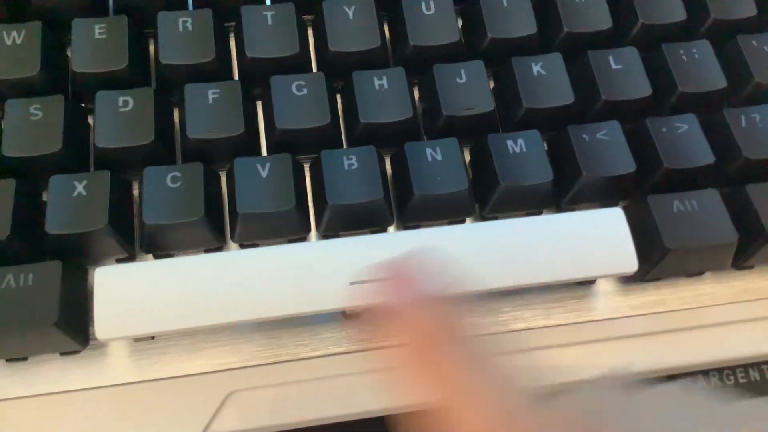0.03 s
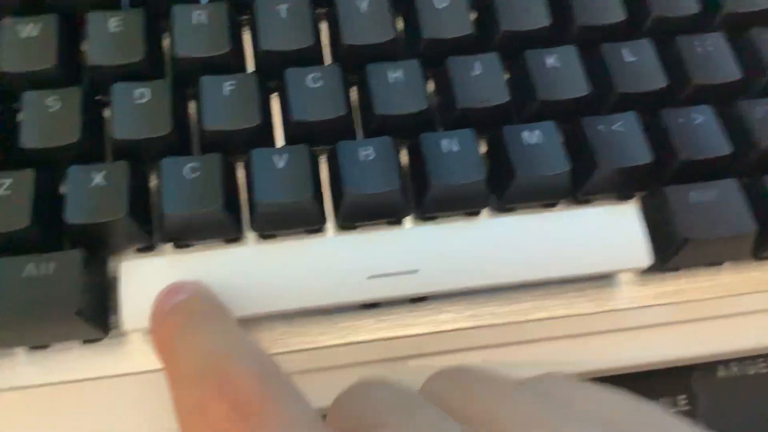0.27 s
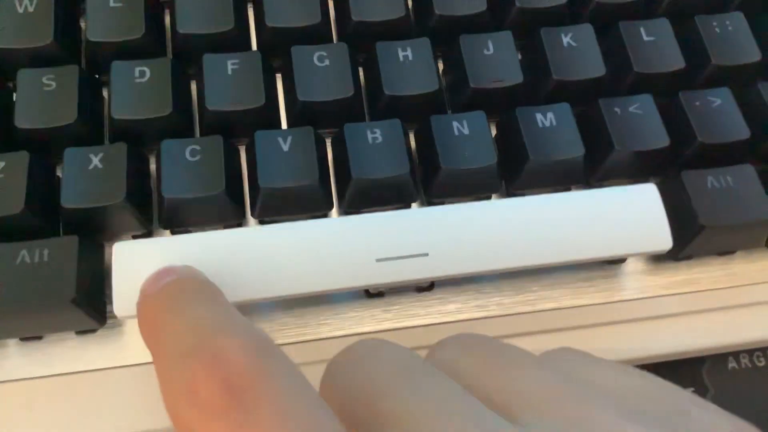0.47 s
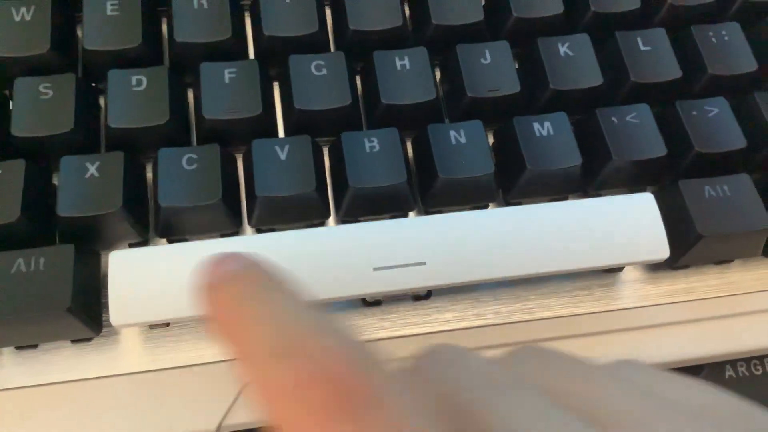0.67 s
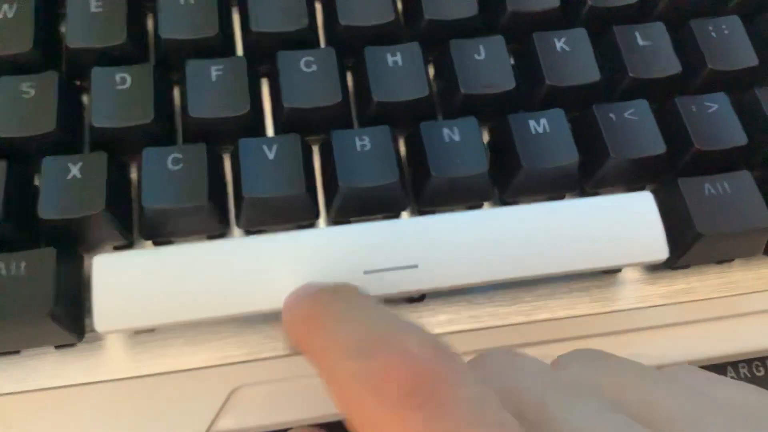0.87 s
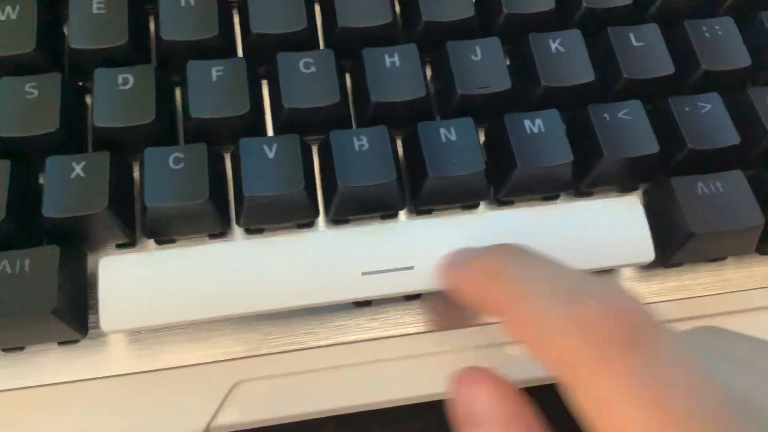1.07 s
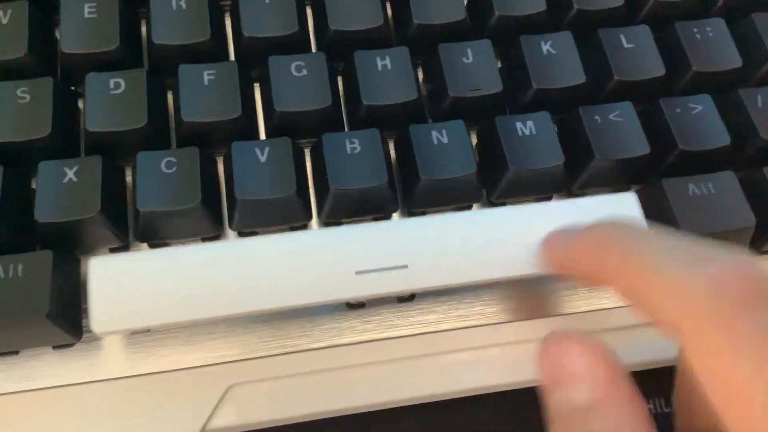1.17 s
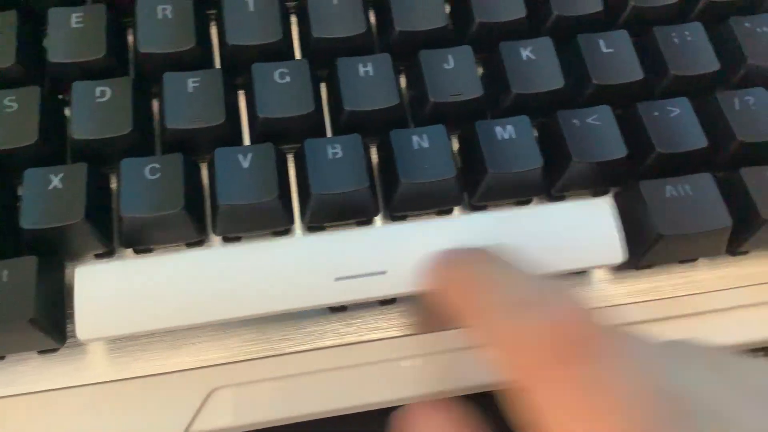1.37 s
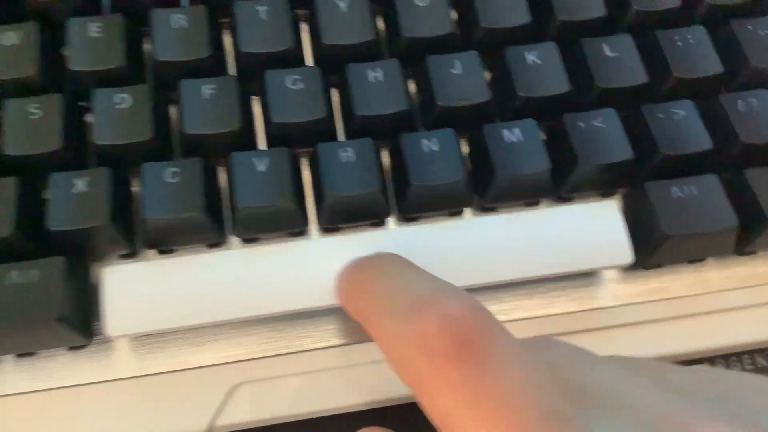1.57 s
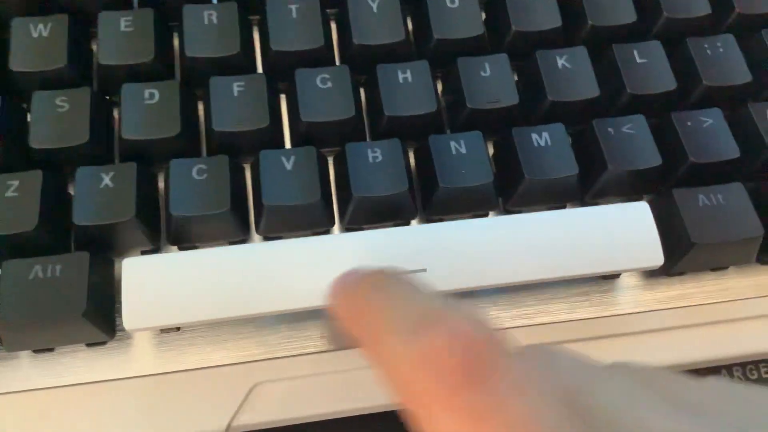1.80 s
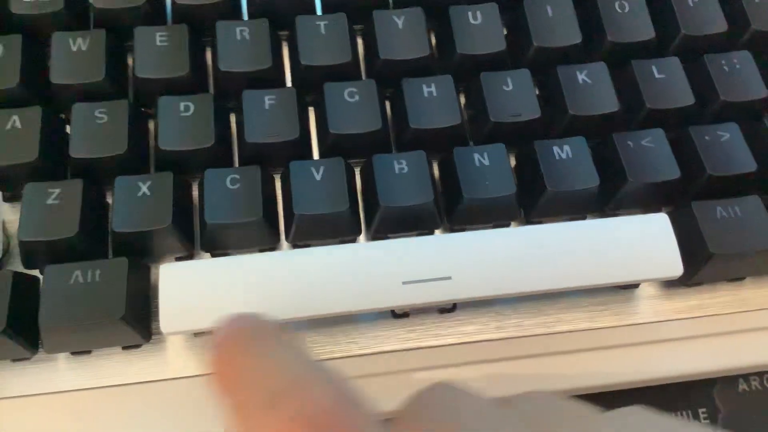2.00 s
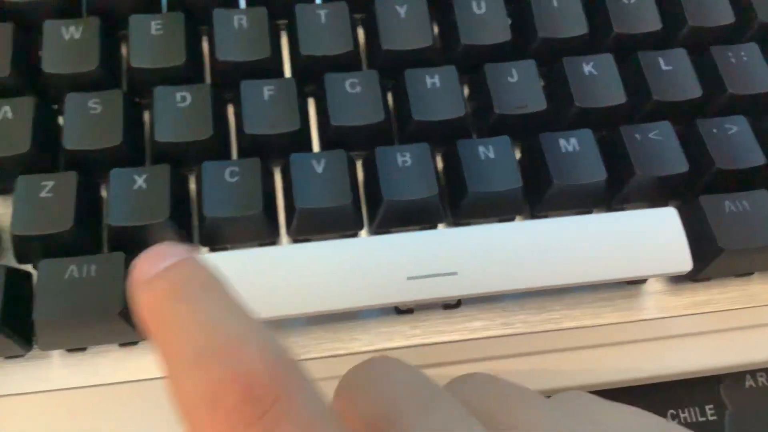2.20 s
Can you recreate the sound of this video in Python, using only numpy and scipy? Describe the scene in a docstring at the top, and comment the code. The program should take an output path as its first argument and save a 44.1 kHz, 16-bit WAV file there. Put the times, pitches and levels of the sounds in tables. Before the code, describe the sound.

A loose keyboard spacebar clacks sharply as a finger taps it quickly and repeatedly.

```python
"""In a small room, close by, a finger taps a loose plastic spacebar eleven times.
The fingertip slaps the bar, or slack parts tick. The bar then clacks at the bottom, thumping the desk,
and springs back with a second, usually louder clack. It rocks, so its two ends land a moment apart;
they chatter and make the bar and keyboard case ring. Faint rubbing runs between the taps, and the room
adds a short echo, a low rumble, hiss and a thin steady tone."""
import sys
import numpy as np
from scipy import signal
from scipy.fft import rfft, irfft
from scipy.io import wavfile
from scipy.ndimage import uniform_filter1d

SR = 44100
rng = np.random.default_rng(int(sys.argv[2]) if len(sys.argv) > 2 else 0)


def pcm_store(signal):
    """Save signal as 16-bit PCM."""
    levels = np.round(np.clip(np.atleast_2d(signal), -1, 1) * 32767)
    wavfile.write(sys.argv[1], SR, levels.astype(np.int16).T)


N = 99225

# The bar hits bottom. bright_db sets the high treble against the low treble; shell_db (hollow bar) and
# case_db (case knock) count from level_db; second_db sets the later end of the bar against the first.
# start_s, level_db, bright_db, shell_db, case_db, second_lag_s, second_db, desk_knock_db, desk_boom_db,
# hollow_hz, hollow_boost_db, crack_hz
BAR_PRESSES = [(0.25, -19.5, 6, -24.5, -25, 0.0011, -8.5, -40.5, -36, 1980, 15, 11900),
               (0.3962, -28.5, 7.5, -16, -20, 0.0014, -21, -49.5, -43.5, 1440, 7, 12400),
               (0.5292, -25, 5, -17, -18, 0.00081, 21, -44.5, -44, 1370, 6, 10700),
               (0.7659, -20, 15, -22, -25.5, 0.00054, 12, -44.5, -37, 1900, 6, 11700),
               (0.9185, -26.5, 4, -15.5, -26.5, 0.0028, 5, -49.5, -40, 1900, 5, 5650),
               (1.072, -26.5, 7, -18, -25.5, 0.00092, -1.5, -45.5, -39.5, 2150, -0.5, 13600),
               (1.2156, -21, 7, -18, -27.5, 0.00077, 15, -46, -43.5, 2120, -0.5, 13500),
               (1.4037, -34, 6, -13.5, -18.5, 0.0012, -21, -52, -43, 1320, 11.5, 13300),
               (1.571, -21, 0, -20.5, -22.5, 0.0019, 1.5, -41.5, -37, 2080, 8, 12000),
               (1.7204, -23.5, 4, -18, -30, 0.0046, -2, -43.5, -40.5, 2290, 7, 5500),
               (1.889, -31.5, 9, -17.5, -24, 0.0031, -3, -46.5, -43, 2780, 6.5, 12100)]
# The bar springs back to its stop: start_s, level_db, bright_db, shell_db, case_db, second_lag_s,
# second_db, build_s, hollow_hz, hollow_boost_db, crack_hz
BAR_RELEASES = [(0.3371, -21.5, 6.5, -11.5, -21.5, 0.0009, -18, 0.00058, 2330, 7.5, 8950),
                (0.472, -14, 7, -22.5, -35.5, 0.0056, -19, 0.0004, 2340, 3, 9400),
                (0.6233, -17, 1, -21, -30, 0.0019, -0.5, 0.00055, 2050, 6, 9120),
                (0.8564, -24, 2.5, -16.5, -31, 0.0039, 1, 0.0007, 1600, 1, 7400),
                (0.9891, -19.5, 4.5, -18.5, -28, 0.0022, -5, 0.00063, 2760, 1, 10400),
                (1.151, -18, 4.5, -22.5, -40.5, 0.0037, -4.5, 0.00079, 3050, 5.5, 10470),
                (1.3214, -21, 4, -21, -41, 0.006, -6.5, 0.00038, 2780, -0.5, 9550),
                (1.4832, -16.5, 2, -19, -25.5, 0.0022, 11, 0.0004, 1700, 7, 10500),
                (1.6655, -20.5, 6, -21, -41.5, 0.0025, -0.5, 0.0005, 1590, 1.5, 10350),
                (1.7856, -12, 2.5, -23, -29.5, 0.0025, -0.5, 0.00077, 1400, 6, 7860),
                (1.9543, -15.9, 3, -19.5, -28, 0.0039, -1, 0.0014, 1206, 6, 7230)]
# The fingertip hits the raised bar:
# start_s, level_db, bright_db, shell_db, build_s, hollow_hz, hollow_boost_db, crack_hz
FINGER_SLAPS = [(0.2436, -16.5, 4.5, -21.5, 0.0014, 2040, 13.5, 10200),
                (0.7561, -20, -1, -21.5, 0.0011, 2100, 12, 9400),
                (1.0446, -24.5, 2.5, -23.5, 0.001, 2520, 8, 6760),
                (1.5598, -23.5, -3, -26, 0.00054, 2314, 5, 9250)]
# Ticks of the switch and the slack support wire: start_s, level_db, bright_db, build_s, crack_hz
SLACK_TICKS = [(0.073, -63.5, 6, 0.0002, 8000), (0.176, -65.5, 0, 0.0002, 8000),
               (0.288, -43, 15, 0.0002, 13000), (0.377, -31, -3, 0.0023, 6050),
               (0.381, -39, -2, 0.0003, 6200), (0.479, -28.5, 0, 0.00046, 9100),
               (0.513, -33.5, 0, 0.0013, 5900), (0.517, -32, 0, 0.0003, 6600),
               (0.616, -35, -2, 0.0002, 7000), (0.6315, -31, 8, 0.00033, 6200),
               (0.8936, -39.5, -9, 0.0002, 5800), (0.8994, -38, -1, 0.0007, 5800),
               (0.9801, -37, -2, 0.0002, 7500), (1.1935, -33.5, 1, 0.0023, 8600),
               (1.2134, -31.5, 1, 0.00043, 8650), (1.352, -38.5, 1.5, 0.002, 8900),
               (1.4475, -44, 5, 0.0012, 10400), (1.506, -38.5, 5, 0.0004, 8900),
               (1.658, -37, 9, 0.0003, 10300), (1.6957, -38, 0, 0.0014, 6250),
               (1.7028, -37.5, 0.5, 0.00035, 7020), (1.808, -37, 11, 0.00047, 10300),
               (1.8634, -28, 0, 0.00063, 6150), (1.8656, -29, -3, 0.00035, 8900),
               (2.075, -59.5, 4, 0.00024, 10100), (2.176, -66, 1.5, 0.00017, 8000)]
# Pitches at which the bar and case ring: pitch_hz, width_hz, gain_db
BAR_RINGS = [(660, 66, -4), (767, 160, -5), (1248, 133, -1.5), (1594, 184, 6), (2044, 216, 4),
             (2323, 130, 4), (2802, 257, 5.5), (3764, 660, -1), (6533, 69, 3.5), (6720, 200, -1),
             (7830, 160, 1.5), (8300, 200, -9), (9810, 520, 5.5), (12600, 310, -18)]
# Tone of the dry crack of plastic on plastic: pitch_hz, gain_db
CRACK_TONE = [(450, -11.5), (700, -6), (1000, -21), (1500, -14), (3200, -5), (5000, -7), (6500, 0),
              (8000, 2), (10400, 0), (11500, -4), (13500, -4), (15800, -24.5)]
# Ranges of a clack (case knock, hollow shell, snap, low treble, high treble): low_hz, high_hz
CLACK_BANDS = [(600, 950), (1080, 2950), (3300, 5200), (5200, 9200), (9200, 17000)]
# The desk's short knock: pitch_hz, gain_db, delay_s, rise_s, decay_s
KNOCK_RINGS = [(298, 2.5, .005, 0.0055, 0.016), (234.5, 2, 0.002, 0.017, 0.023),
               (201.3, 0, 0.0019, 0.0095, 0.034), (381.6, -0.5, 0.0024, 0.00093, 0.0066)]
# The desk's deeper boom: pitch_hz, gain_db, delay_s, rise_s, decay_s
BOOM_RINGS = [(121.7, 0, 0.0094, 0.034, 0.0085), (141.5, -11.5, .008, 0.026, 0.068),
              (94.7, -13.5, .018, 0.016, 0.052)]
# The room's echo tail, which takes fade_s to drop by 60 dB: pitch_hz, gain_db, fade_s
ROOM_TAIL = [(120.3, -9, 0.38), (302, -4, 0.51), (626, -11, 0.33), (910, -12, 0.23), (1090, -3, 0.37),
             (1440, -9.5, 0.29), (2280, -12.5, 0.2), (4030, -12, 0.24), (7940, -17, 0.22),
             (13400, -20, 0.2)]
# Tone of the still room's rumble and the microphone's hiss: pitch_hz, gain_db
BACKGROUND_TONE = [(25, -40.5), (38, -38), (55, -4.5), (108, 7), (170, -6), (230, -4), (380, -20.5),
                   (620, -11), (740, -16), (820, -10), (950, -23.5), (2500, -29.5), (6000, -30.5),
                   (8500, -26.5), (9800, -17.5), (10800, -23.5), (12000, -20.5), (16000, -43.5)]

CLACK_SAMPLES, LEAD_S = 4096, .012  # the lead leaves space for the build-up before a landing
CHATTER_DECAY_S, CRACK_DECAY_S, BUZZ_DECAY_S = .00141, .0027, .0073
PRESS_BUILD_S, SECOND_BUILD_S, BUZZ_BUILD_S = .00034, .0006, .0012
GRAIN_DB, DETUNE_HZ = 4, 35  # unevenness of the tiny contacts; how far the finger shifts the ringing
CRACK_DB, BUZZ_DB, SNAP_DB = 3, -22, -21  # compared with the ringing, first landing and clack level
LIGHT_CASE_DB, LIGHT_LAG_S, LIGHT_SECOND_DB = -33.5, .0012, -24  # shared by ticks and slaps


def gain(db):
    """Turn decibels into a multiplier."""
    return 10 ** (np.asarray(db) / 20)


def at_level(x, db, burst_s=.01):
    """Give a sound the energy of a short burst at this level."""
    return x * gain(db) * np.sqrt(burst_s * SR / np.sum(x ** 2))


def tone_db(table, hz):
    """Read gains between a table's rows, on a musical pitch scale."""
    pitches, gains_db = np.array(table).T
    return np.interp(np.log(hz + 1), np.log(pitches), gains_db)


def hump_db(hz, centre_hz, db, width):
    """A rounded boost around one pitch; width is a share of that pitch."""
    return db * np.exp(-(np.log((hz + 1) / centre_hz) / width) ** 2)


def tone_filter(db):
    """A filter with these gains that rings only after a hit, never before it."""
    cepstrum = irfft(np.log(gain(db)))
    half = len(cepstrum) // 2
    cepstrum[1:half] *= 2
    cepstrum[half + 1:] = 0
    return np.exp(rfft(cepstrum))


def add(out, x, start_s):
    """Mix a sound in at a given time."""
    i = max(int(round(start_s * SR)), 0)
    out[i:i + len(x)] += x[:max(len(out) - i, 0)]


def background(noise_db=-62, whine_hz=834, whine_db=-79.5):
    """Low room rumble, faint hiss and a thin steady tone."""
    hz = np.arange(N // 2 + 1) * SR / N
    noise = irfft(rfft(rng.standard_normal(N)) * gain(tone_db(BACKGROUND_TONE, hz)), N)
    whine = np.sqrt(2) * np.sin(2 * np.pi * whine_hz * np.arange(N) / SR)
    return gain(noise_db) * noise / np.std(noise) + gain(whine_db) * whine


def landing(t, build_s, decay_s):
    """Strength of one landing: chatter builds up as the parts meet, then dies away."""
    return np.exp(np.minimum(t, 0) / build_s - np.maximum(t, 0) / decay_s)


def clack(level_db, bright_db, shell_db, case_db, second_lag_s, second_db, build_s,
          hollow_hz, hollow_boost_db, crack_hz):
    """Both ends of the bar land and chatter; the tiny contacts crack and ring the bar and case."""
    n = CLACK_SAMPLES
    t = np.arange(n) / SR - LEAD_S
    hz = np.arange(n // 2 + 1) * SR / n
    grains = rng.choice([-1, 1], n) * gain(GRAIN_DB * np.clip(rng.standard_normal(n), -2, 2))
    ring = 0
    for pitch_hz, width_hz, db in BAR_RINGS:
        pitch_hz *= 1 + min(DETUNE_HZ / pitch_hz, .04) * rng.standard_normal()
        damping = 1j * hz * width_hz
        ring = ring + gain(db) * damping / (pitch_hz ** 2 - hz ** 2 + damping)
    crack = gain(CRACK_DB) * tone_filter(tone_db(CRACK_TONE, hz))
    # The spot where the blow lands favours one hollow pitch and one crack pitch.
    spot = tone_filter(hump_db(hz, hollow_hz, hollow_boost_db, width=.14)
                       + hump_db(hz, crack_hz, db=6, width=.078))
    buzz = gain(BUZZ_DB) * landing(t, BUZZ_BUILD_S, BUZZ_DECAY_S)  # the loose bar buzzes on

    def force(delay_s, decay_s):
        """Spectrum of the grainy push from both ends and the buzz."""
        first = landing(t - delay_s, build_s, decay_s)
        second = gain(second_db) * landing(t - delay_s - second_lag_s, SECOND_BUILD_S, decay_s)
        return rfft(grains * np.sqrt(first ** 2 + buzz ** 2 + second ** 2))

    def band(edges_hz, db, delay_s=0, decay_s=None):
        """One pitch range of the clack; decay_s, if given, is shared by chatter and crack."""
        ringing = ring * force(delay_s, decay_s or CHATTER_DECAY_S)
        cracking = crack * force(delay_s, decay_s or CRACK_DECAY_S)
        band_pass = signal.butter(4, edges_hz, "band", fs=SR, output="sos")
        return at_level(signal.sosfilt(band_pass, irfft(spot * (ringing + cracking))), db)

    case_hz, shell_hz, snap_hz, low_treble_hz, high_treble_hz = CLACK_BANDS
    treble = at_level(band(low_treble_hz, 0) + band(high_treble_hz, bright_db), level_db)
    shell = band(shell_hz, level_db + shell_db, delay_s=.00012, decay_s=.005)
    snap = band(snap_hz, level_db + SNAP_DB, decay_s=.006)
    knock = band(case_hz, level_db + case_db, delay_s=.0017, decay_s=.0034)
    return treble + shell + snap + knock


def ticks():
    """The switch and the slack wire tick, like tiny clacks."""
    out = np.zeros(N)
    for start_s, level_db, bright_db, build_s, crack_hz in SLACK_TICKS:
        tick = clack(level_db, bright_db, shell_db=-18, case_db=LIGHT_CASE_DB,
                     second_lag_s=LIGHT_LAG_S, second_db=LIGHT_SECOND_DB, build_s=build_s,
                     hollow_hz=2800, hollow_boost_db=3, crack_hz=crack_hz)
        add(out, tick, start_s - LEAD_S)
    return out


def echo_tail(rise_s=.004):
    """Many small echoes blur into a short tail that lasts longest in the bass."""
    n = 4 * CLACK_SAMPLES
    t = np.arange(n) / SR
    hz = np.arange(n // 2 + 1) * SR / n
    noise = rfft(rng.standard_normal(n))
    log_pitches = np.log([row[0] for row in ROOM_TAIL])
    tail = 0
    for this_row, (_, db, fade_s) in zip(np.eye(len(ROOM_TAIL)), ROOM_TAIL):
        band = irfft(noise * np.interp(np.log(hz + 1), log_pitches, this_row))
        fade = np.minimum(t / rise_s, 1) * np.exp(-np.log(1000) * t / fade_s)
        tail = tail + gain(db) * band * fade / np.sqrt(np.sum(fade ** 2))
    return tail


def room(x, tails=5, hand_move_s=.1103, wall_s=.018, wall_db=-24.5):
    """Add a near wall's echo and a tail that shifts as the moving hand changes the sound's paths."""
    out = x.copy()
    hand_place = np.arange(N) / SR / hand_move_s
    for k in range(tails):
        share = np.clip(1 - np.abs((hand_place - k) % tails - 1), 0, 1)  # the tails take turns
        out += signal.fftconvolve(x * np.sin(np.pi / 2 * share), echo_tail())[:N]
    add(out, gain(wall_db) * x, wall_s)
    return out


def rubbing(level_db=-56, uneven_db=6, grain_samples=128):
    """The finger and the slack wire rub faintly while the hand is at work."""
    hz = np.arange(N // 2 + 1) * SR / N
    grains = gain(uneven_db * np.minimum(rng.exponential(size=N // grain_samples + 1), 3))
    roughness = uniform_filter1d(np.repeat(grains, grain_samples), grain_samples)[:N]
    rub = irfft(rfft(roughness * rng.standard_normal(N)) * gain(tone_db(CRACK_TONE, hz)), N)
    at_work = np.interp(np.arange(N) / SR, [.24, .3, 1.9, 1.96], [0, 1, 1, 0])
    return rub / np.std(rub) * gain(level_db) * at_work


def slaps():
    """The fingertip strikes the raised bar and slams out its slack."""
    out = np.zeros(N)
    for start_s, level_db, bright_db, shell_db, build_s, *tone in FINGER_SLAPS:
        slap = clack(level_db, bright_db, shell_db, LIGHT_CASE_DB, LIGHT_LAG_S, LIGHT_SECOND_DB,
                     build_s, *tone)
        add(out, slap, start_s - LEAD_S)
    return out


def presses():
    """The bar clacks at the bottom and thumps the desk."""
    out = np.zeros(N)
    for start_s, *blow, knock_db, boom_db, hollow_hz, hollow_boost_db, crack_hz in BAR_PRESSES:
        add(out, clack(*blow, PRESS_BUILD_S, hollow_hz, hollow_boost_db, crack_hz), start_s - LEAD_S)
        add(out, desk(KNOCK_RINGS, knock_db) + desk(BOOM_RINGS, boom_db), start_s)
    return out


def desk(rings, level_db, low_cut_hz=55):
    """The desk's tones swell and fade; slow bending waves bring the low ones late."""
    t = np.arange(8 * CLACK_SAMPLES) / SR
    out = 0
    for pitch_hz, db, delay_s, rise_s, decay_s in rings:
        age = np.maximum(t - delay_s, 0)
        swell = np.sin(np.pi / 2 * np.minimum(age / rise_s, 1)) ** 2
        fade = np.exp(-np.maximum(age - rise_s, 0) / decay_s)
        pitch_hz *= 1 + .03 * rng.standard_normal()
        out = out + gain(db) * swell * fade * np.sin(2 * np.pi * (pitch_hz * age + rng.random()))
    low_cut = signal.butter(2, low_cut_hz, "high", fs=SR, output="sos")
    return at_level(signal.sosfilt(low_cut, out), level_db)


def releases(knock_db=-52.5, boom_db=-50.5):
    """The bar springs back and clacks against its stop, barely shaking the desk."""
    out = np.zeros(N)
    for start_s, *blow in BAR_RELEASES:
        add(out, clack(*blow), start_s - LEAD_S)
        add(out, desk(KNOCK_RINGS, knock_db) + desk(BOOM_RINGS, boom_db), start_s)
    return out


def scene():
    """The spacebar in its room, as one channel."""
    spacebar = presses() + releases() + slaps() + ticks() + rubbing()
    return (room(spacebar) + background())[None]


def record(dry):
    """Round off the loudest peaks and cut the highest treble."""
    ceiling, top_hz = .75, 16000
    rounded = dry / (1 + (dry / ceiling) ** 4) ** (1 / 4)
    return signal.sosfilt(signal.ellip(8, .2, 80, top_hz, fs=SR, output="sos"), rounded)


dry = scene()
out = record(dry)
pcm_store(out)
```